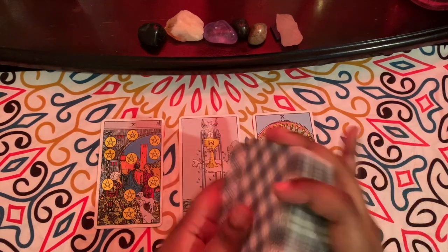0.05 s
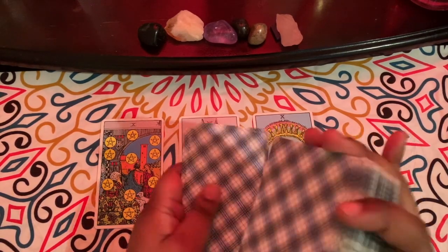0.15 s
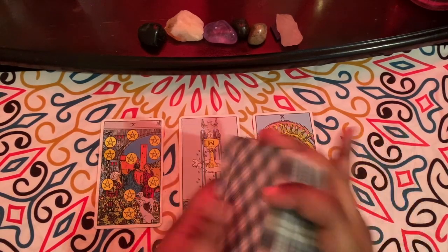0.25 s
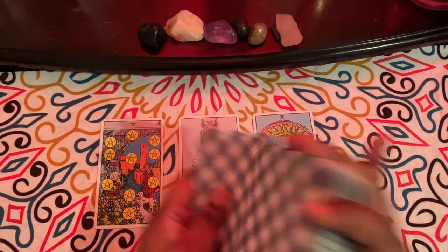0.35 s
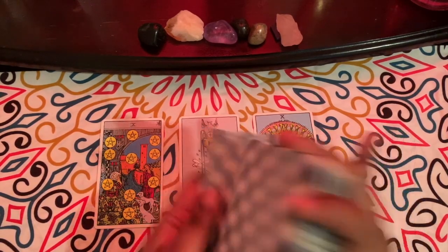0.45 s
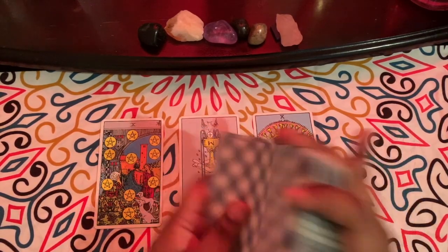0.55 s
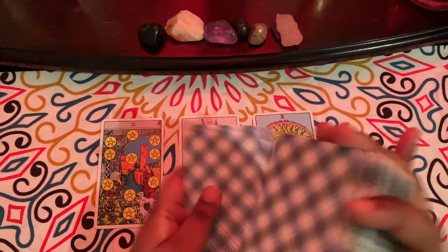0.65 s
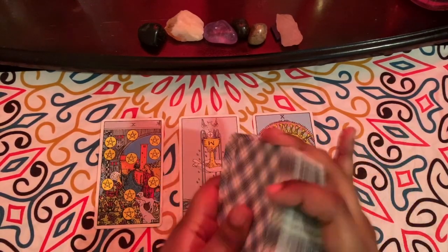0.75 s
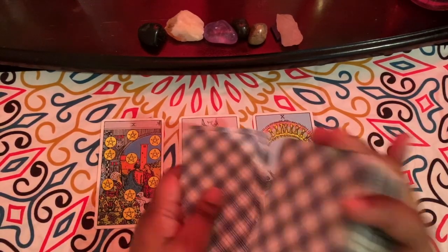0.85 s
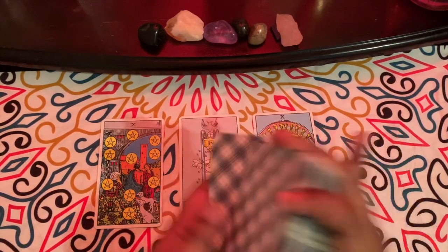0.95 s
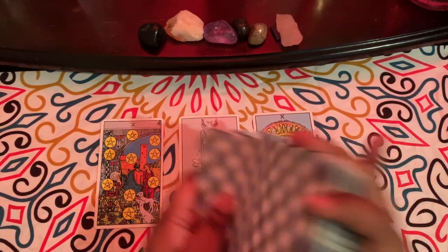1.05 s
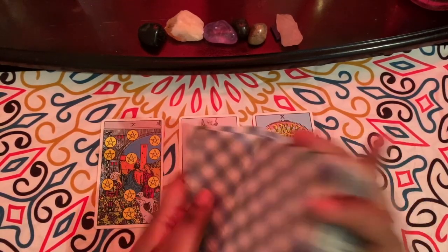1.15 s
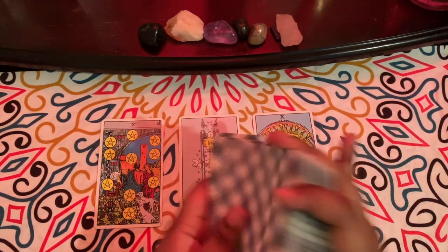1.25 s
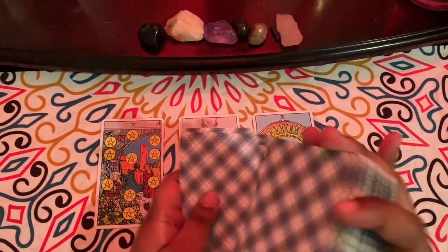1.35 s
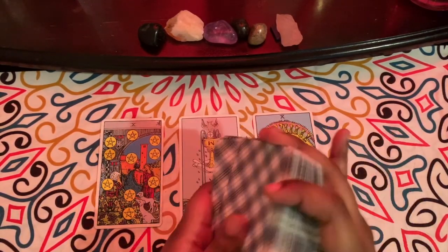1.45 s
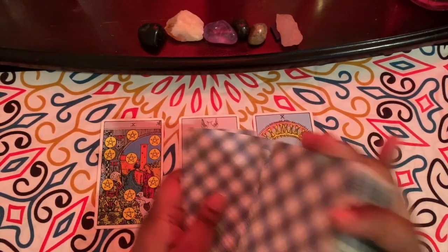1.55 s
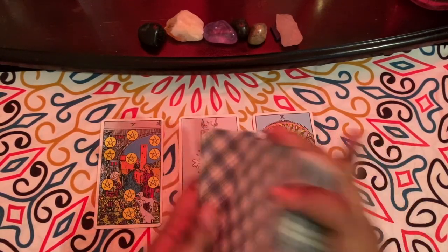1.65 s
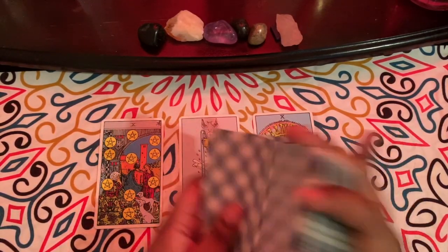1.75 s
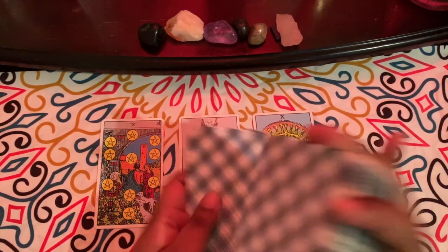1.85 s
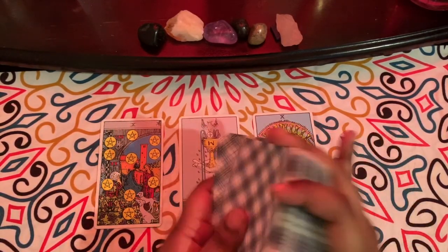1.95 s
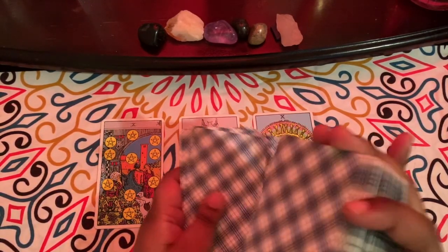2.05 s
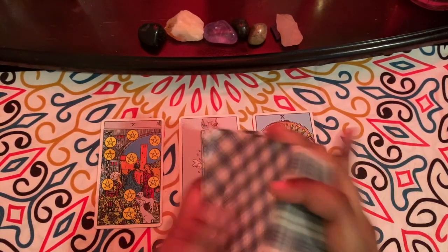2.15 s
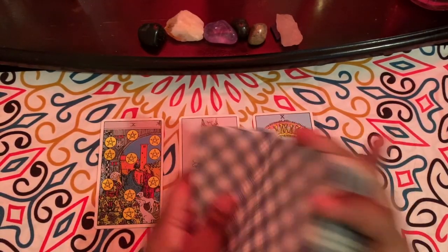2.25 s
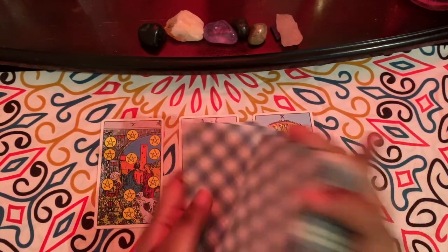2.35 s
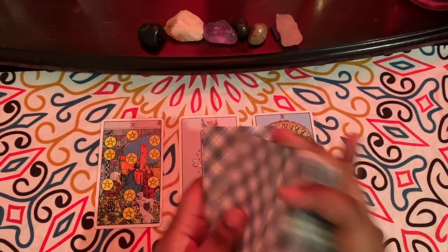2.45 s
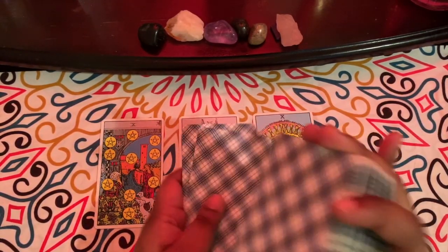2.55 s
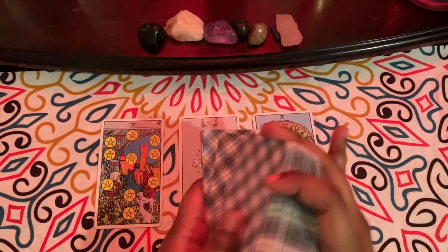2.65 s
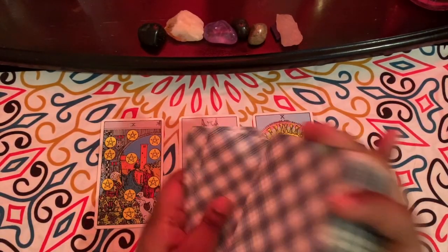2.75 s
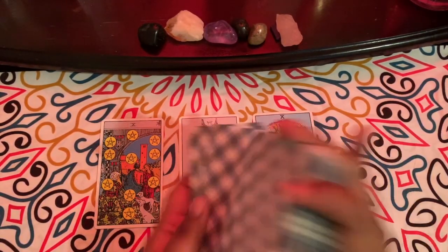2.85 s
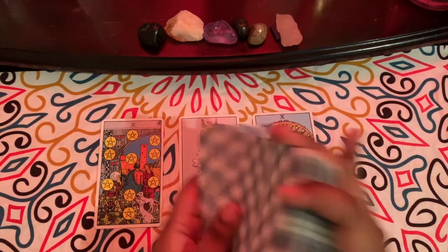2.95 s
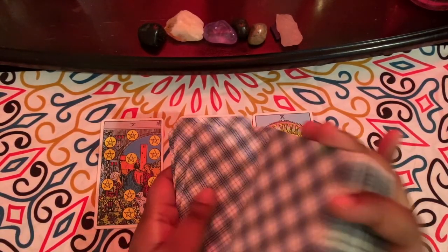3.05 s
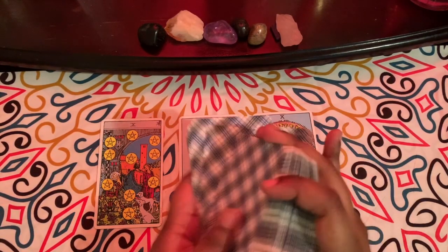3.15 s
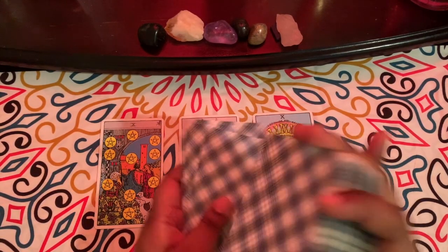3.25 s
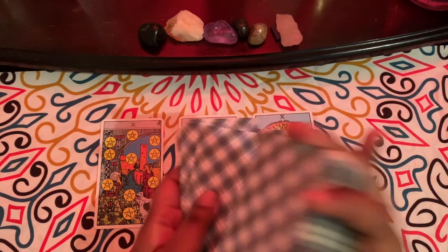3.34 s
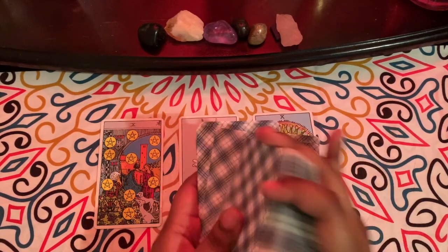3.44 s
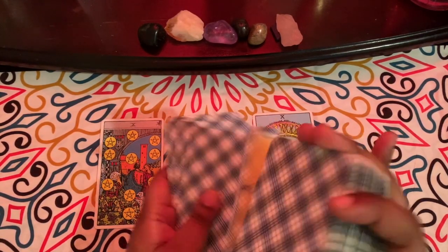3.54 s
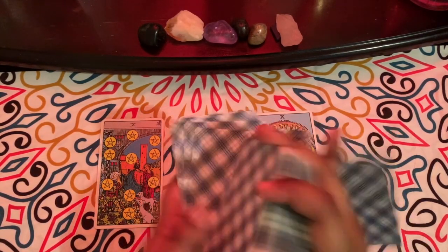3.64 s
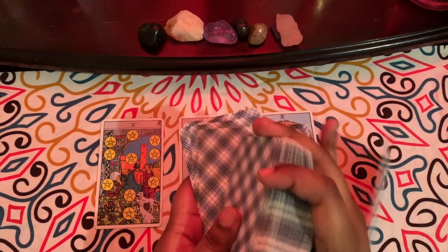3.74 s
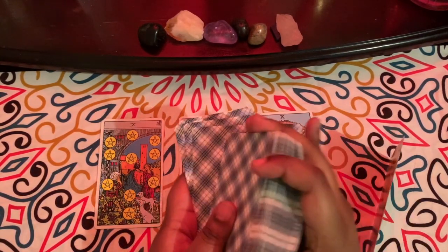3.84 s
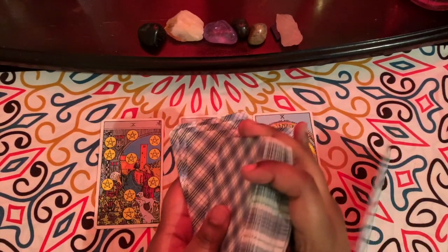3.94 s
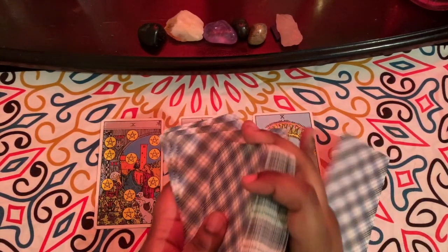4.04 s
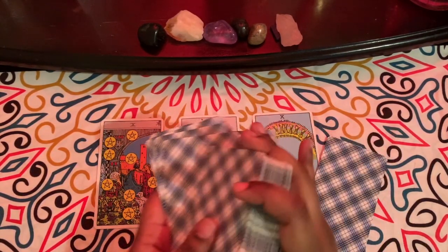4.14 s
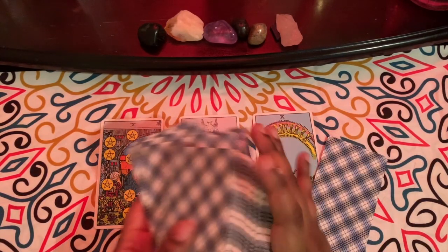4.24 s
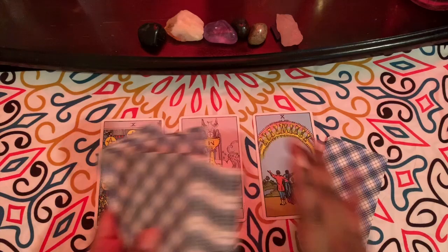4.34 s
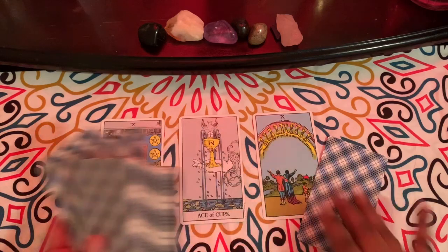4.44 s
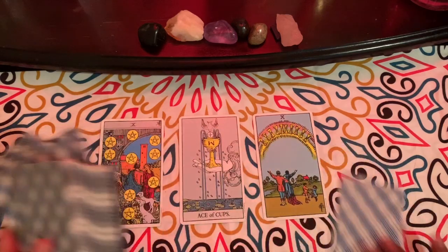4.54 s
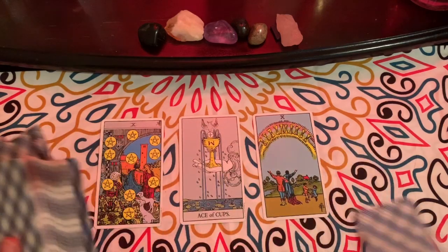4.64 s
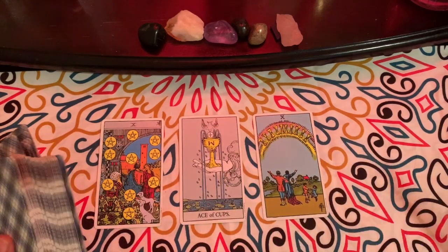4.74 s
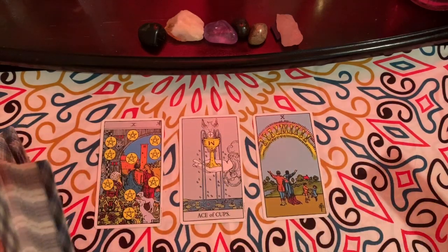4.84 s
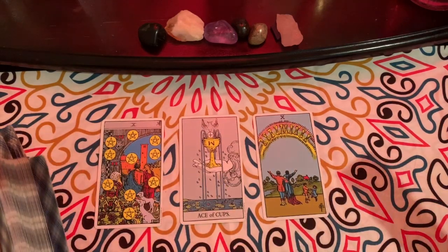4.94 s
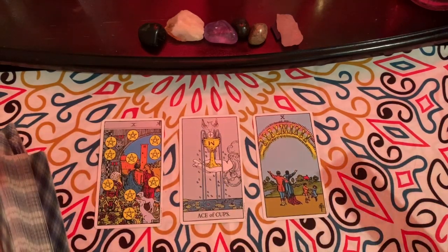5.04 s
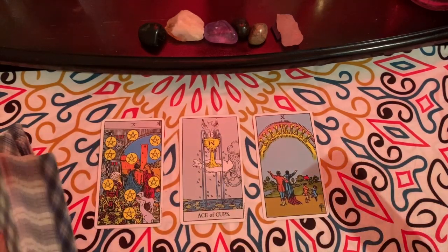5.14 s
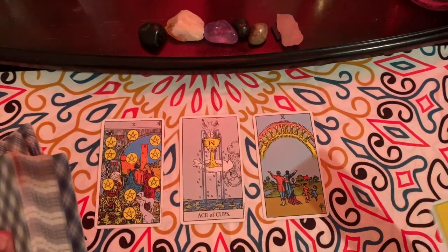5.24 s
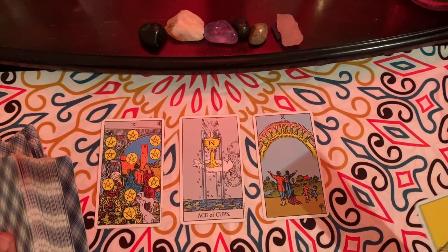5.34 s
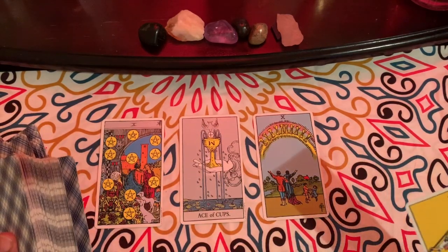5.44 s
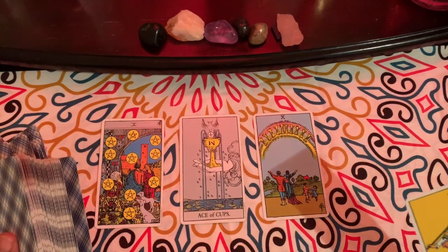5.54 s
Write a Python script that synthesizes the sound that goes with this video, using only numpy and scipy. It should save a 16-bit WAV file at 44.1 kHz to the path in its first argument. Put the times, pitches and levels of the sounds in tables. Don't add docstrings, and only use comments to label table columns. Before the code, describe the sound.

A close, detailed stereo sound of playing cards in a quiet room with slight reverberation. From 0 to about 3.7 s a deck is shuffled overhand in a steady rhythm, roughly four strokes per second. Each stroke has two parts: a packet drops with a small cluster of papery clicks and a rustle, then slides with a grainy swish that swells into a crisp, hollow slap, with bright edge snaps and a slight low push of air. Strokes vary a little in brightness and force. The last slap comes near 3.57 s, a final drop at 3.65 s. At 3.76 s a soft, dull landing on padded cloth; around 4.05 to 4.27 s, faint ticks and short card strokes; near 4.49 s a small snap with a low soft thud. A weak brush and muffled tap follow at 4.7 to 4.8 s. Then only faint air, low rumble and barely audible hum until about 5.6 s.

```python
import sys
import numpy as np
from scipy import signal
from scipy.fft import rfft, irfft, next_fast_len
from scipy.io import wavfile
from scipy.ndimage import uniform_filter1d

SR = 44100
rng = np.random.default_rng(int(sys.argv[2]) if len(sys.argv) > 2 else 0)


def store_wav(level_fs):
    pcm = np.round(np.clip(np.atleast_2d(level_fs), -1, 1) * 32767)
    wavfile.write(sys.argv[1], SR, pcm.T.astype(np.int16))


def voltage_ratio(level):
    return 10 ** (np.asarray(level, float) / 20)


N = 246519

# t/s, ring level/dB, snap level/dB, snap f/Hz, edge tick level/dB
SLAP_CORNERS = [(0.166, -25, -14, 3400, -22), (0.4124, -13, -9.5, 3944, -9),
                (0.6361, -17, -12.5, 3830, -11), (0.8734, -15, -10.5, 3240, -9.5),
                (1.1231, -13.5, -9.5, 3030, -12), (1.35, -12.5, -6.5, 3130, -7),
                (1.573, -17.5, -15, 3404, -19.5), (1.8276, -21, -14.5, 3555, -3.5),
                (2.0637, -10, -6, 3260, -8), (2.3125, -17.5, -5.5, 3700, -7),
                (2.5457, -20.5, -7, 1910, -10.5), (2.7829, -18.5, -13.5, 2290, -10),
                (3.0486, -22.5, -4, 3230, -10.5), (3.284, -28.5, -17.5, 4100, -6.5),
                (3.2894, -17.5, -12.5, 4030, -17.5)]
# t/s, ring level/dB, snap level/dB, snap f/Hz, edge tick level/dB
SLAP_EDGES = [(0.1717, -4, -6.5, 3860, -12.5), (0.4195, -12.5, -7.5, 3850, -7), (0.6418, -8, -8, 3270, -6),
              (0.8785, -7, -47, 1910, -6.5), (1.129, -14, -15, 2850, -1), (1.3555, -8, -7.5, 3100, -7),
              (1.5795, -8.5, -8, 3160, 1.5), (1.8327, -3, -10, 3360, -13), (2.0689, -1.5, -5, 2300, -7),
              (2.318, -22.5, -6.5, 3580, 2), (2.55, -4, -2.5, 1950, -2), (2.7872, -10.5, -2, 2080, 3),
              (3.0537, -15.5, -10, 3530, 1.5), (3.2933, -10.5, -8.5, 2000, -0.5),
              (3.568, -5, -7.5, 3400, -6.5)]
DECK_HZ, CORNER_HZ = 1250, 1400
CRACK_HZ, CRACK_DB = 2000, -6
# t/s, ring level/dB, ring f/Hz, edge tick level/dB
TOUCHES = [(0.0464, -18, 2030, -8.5), (0.2821, -22.5, 1150, -13), (0.5038, -41, 1640, -22),
           (0.756, -37, 1280, -16), (0.9948, -23.5, 915, -23), (1.2275, -17, 892, -13.5),
           (1.4663, -38.5, 920, -14.5), (1.7023, -20, 857, -20), (1.9503, -29.5, 910, -13),
           (2.1859, -18.5, 1030, -22), (2.425, -10, 1178, -17), (2.6684, -28.5, 860, -14),
           (2.9149, -23.5, 700, -33.5), (3.1613, -11.5, 1329, -15), (3.4105, -8.5, 760, -48.5),
           (3.6508, -24.5, 690, -19)]
# t/s, ring level/dB, ring f/Hz, edge tick
# level/dB
LANDINGS = [(0.058, -13, 1024, -12), (0.284, -26, 1100, -33), (0.2901, -13, 990, -35.5),
            (0.514, -30, 1240, -5.5), (0.5186, -12.5, 1220, -14), (0.7659, -16.5, 1000, -10.5),
            (1.002, -35, 1100, -25), (1.235, -18.5, 904, -13.5), (1.2393, -15.5, 895, -31),
            (1.247, -23.5, 1000, -17.5), (1.4732, -9, 1110, -17), (1.485, -25, 1240, -29),
            (1.71, -20.5, 712, -14), (1.9552, -7, 1210, -4.5), (1.96, -14.5, 1294, -15.5),
            (1.9665, -19.5, 1290, -35.5), (2.194, -22, 1020, -13), (2.4318, -15, 1230, -24),
            (2.4413, -14.5, 1230, -28), (2.6734, -16.5, 1183, -13.5), (2.9285, -38, 1197, -24.5),
            (3.1674, -13, 1247, -4.5), (3.172, -12, 700, -13), (3.1789, -14, 1247, -14.5),
            (3.4214, -17.5, 795, -14.5), (3.6559, -20.5, 1250, -4), (3.67, -23.5, 1100, -20)]
# t/s, ring level/dB, ring
# f/Hz, edge tick level/dB
STRAY_EDGES = [(0.074, -18.5, 1250, -45.5), (0.3107, -25.5, 1230, -12), (0.546, -35, 995, -28),
               (0.7814, -18, 1020, -13), (0.7864, -6, 1213, -13), (1.021, -28, 930, -18),
               (1.26, -24, 2200, -18), (1.4914, -21, 760, -23), (1.4963, -13.5, 1220, -20.5),
               (2.218, -36.5, 1079, -16), (2.4608, -28.5, 1270, -18), (2.699, -35, 1410, -23.5),
               (2.936, -24, 1350, -22.5), (2.958, -26.5, 1260, -41.5), (3.257, -25, 1670, -24),
               (3.429, -25, 1109, -13), (3.5906, -29.5, 1200, -19), (3.678, -23.5, 1060, -12),
               (0.0808, -24, 1300, -29), (0.173, -11, 1770, -29.5), (0.316, -19, 1300, -18),
          (0.527, -17, 1100, -27.5), (0.553, -33, 1300, -26), (0.76, -40, 1200, -28),
          (0.953, -55, 1634, -31.5), (1.012, -27.5, 1250, -29.5), (0.75, -22.5, 1300, -33.5),
          (1.2335, -15, 1453, -28.5), (1.508, -27.5, 1250, -42.5), (1.734, -27, 1444, -33.5),
          (1.985, -31, 1300, -31.5), (2.226, -29, 797, -34.5), (2.437, -18, 1227, -30.5),
          (2.453, -28, 1250, -32.5), (2.679, -21.5, 570, -19), (2.703, -35.5, 1300, -25),
          (3.227, -33, 1320, -35), (3.445, -30, 900, -33), (3.569, -8, 850, -34.5),
          (3.598, -24.5, 900, -33), (3.8, -42, 1300, -33)]
FACE_HZ, FACE_SPREAD, FACE_DB = 3200, 0.42, -11.5
# t/s, ring level/dB, ring f/Hz, snap level/dB, snap f/Hz
TAPS = [(3.762, -31, 530, -60, 1510), (3.887, -49, 1250, -49, 2620), (4.0445, -34, 1300, -37, 3400),
        (4.0494, -28.5, 1230, -29.5, 4200), (4.0513, -35, 1700, -42, 4400), (4.118, -49, 900, -40, 3320),
        (4.221, -40, 1600, -61, 3460), (4.245, -44, 1600, -33, 4020), (4.2675, -35.5, 680, -30, 2455),
        (4.482, -40, 1740, -28, 3200), (4.492, -48, 1910, -38.5, 3000), (4.5033, -44, 1520, -31.5, 6200),
        (4.76, -65.5, 890, -68, 1990)]
TAP_EDGE_DB = -4
# t/s, level/dB, f/Hz
FACE_SNAPS = [(0.0464, -19.5, 3300), (0.058, -23, 3250), (0.074, -23, 3300), (0.2895, -21, 3260),
              (0.505, -23, 2420), (0.5187, -9, 3120), (0.7864, -14, 2300), (0.9948, -23, 2590),
              (1.07, -21.5, 3490), (1.2275, -17, 2200), (1.24, -22, 2290), (1.26, -24, 2200),
              (1.4663, -18, 2996), (1.4959, -13.5, 3880), (1.7023, -25.5, 2000), (1.9503, -20, 2500),
              (1.9556, -12, 2200), (2.1859, -19.5, 3800), (2.22, -25.5, 3000), (2.425, -18.5, 3000),
              (2.6684, -26, 2800), (2.9149, -29, 2202), (2.958, -28.5, 3500), (3.1672, -9.5, 4030),
              (3.4095, -30, 1780), (3.6563, -7, 2920), (3.659, -24, 4250), (4.016, -46, 1140),
              (4.4815, -30, 2880), (4.488, -40, 2980)]
# f/Hz, level/dB
TICK_SPECTRUM = [(1500, -67.5), (3500, -29.5), (5000, 1), (7500, 2.5), (12000, -4.5), (14000, -4.5),
                 (16500, -28.5)]

# t/s, rustle level/dB, air thump level/dB, knock level/dB
DROPS = [(0.042, -14, -50, -36.5), (0.281, -11.5, -55, -34), (0.512, -12, -42, -35.5),
         (0.756, -10.5, -37, -36.5), (0.992, -12.5, -40.5, -37), (1.227, -9.5, -43.5, -35.5),
         (1.465, -12, -41, -63), (1.701, -13.5, -39, -32.5), (1.946, -11.5, -44.5, -42),
         (2.183, -12.5, -48.5, -34), (2.421, -10, -46.5, -32), (2.667, -15, -47, -32.5),
         (2.91, -14.5, -68.5, -36.5), (3.156, -10, -45, -36), (3.405, -13.5, -46, -36),
         (3.65, -7.5, -50.5, -30.5)]
# t/s, slide level/dB, slide length/s, thump level/dB, knock level/dB
SLAPS = [(0.163, -3, 0.092, -36, -29.5), (0.41, -3, 0.079, -39.5, -35), (0.635, -3, 0.07, -35, -28.5),
         (0.872, -4, 0.072, -36, -27.5), (1.123, -1.5, 0.067, -36.5, -30.5), (1.351, -2, 0.072, -37, -24.5),
         (1.577, 1, 0.059, -34, -29.5), (1.829, -1.5, 0.076, -35, -27.5), (2.066, -1.5, 0.067, -35, -24.5),
         (2.314, -1.5, 0.075, -35.5, -31.5), (2.548, -3, 0.07, -34, -33.5), (2.786, 0.5, 0.054, -35.5, -36),
         (3.051, -3, 0.079, -36, -32), (3.29, -1.5, 0.079, -36.5, -35.5), (3.573, -4.5, 0.12, -36.5, -35.5)]
RUSTLE_S, SWELL_DB = 0.039, 2
SETTLE_DB, SETTLE_T60 = -41.5, 0.31
# f/Hz, level/dB
SCRAPE_SPECTRUM = [(200, -19.5), (500, -4.5), (950, -2.5), (1280, -7.5), (1700, -2), (3300, -6.5),
                   (5500, -7.5), (8000, -12.5), (12500, -18), (14000, -30), (16000, -27.5)]
# f/Hz, level/dB
SWISH_SPECTRUM = [(200, -6), (700, -6.5), (1500, -2.5), (3000, 2.5), (5000, -5), (7500, -4.5),
                  (12500, -13.5), (14000, -17.5), (16000, -22)]
SLIPS_PER_S, SLIP_SPREAD_DB, SLIP_DB, SLIP_S = 900, 4, -7, 0.0003
HOLLOW_HZ, HOLLOW_WIDTH_HZ, HOLLOW_DB = 1250, 60, -16.5

# t/s of peak, level/dB, rise/s, fall/s (each over 20 dB), brightness/dB
ZIPS = [(0.158, -42.5, 0.044, .015, 4.5), (0.398, -39, .03, 0.016, 5), (0.508, -35.5, 0.0044, 0.013, -7),
        (0.628, -30.5, .03, 0.014, -7), (0.858, -37.5, .04, 0.02, -4), (1.07, -38, 0.01, .04, -10),
        (1.115, -41, .04, .015, 0.5), (1.34, -34.5, .04, 0.017, -1.5), (1.566, -38, 0.023, .02, 7),
        (1.816, -33, 0.046, 0.033, -4), (2.052, -35.5, 0.033, .02, 1), (2.303, -33.5, .04, .02, 3),
        (2.536, -31, 0.028, .015, 1), (2.776, -33, 0.05, 0.031, -1), (3.035, -34.5, 0.043, 0.028, 1),
        (3.277, -36, 0.046, 0.022, 0.5), (3.55, -40, 0.023, 0.01282, 13.5), (3.665, -36, .02, 0.061, -5)]
# f/Hz, level/dB
ZIP_LOW = [(800, -23.5), (2500, -10), (4000, -3), (7000, 3), (10000, -17)]
# f/Hz, level/dB
ZIP_HIGH = [(4000, -25), (7500, 0), (12000, -1), (15000, -7), (16500, -18.5)]
# t/s of peak, level/dB, f/Hz, rise/s, fall/s
SINGS = [(0.385, -47, 1600, 0.033, 0.024), (0.525, -39.5, 1150, 0.013, 0.035),
         (1.242, -34, 1400, 0.024, 0.044), (2.433, -30.5, 1240, 0.012, 0.034),
         (2.674, -34.5, 1150, 0.0079, .04), (2.93, -37, 1250, 0.023, 0.044),
         (3.17, -32.5, 1250, 0.015, 0.053), (3.596, -35, 943, .03, 0.037), (3.672, -34, 1170, .02, 0.06),
         (4.041, -56.5, 3440, 0.076, 0.13), (4.046, -46, 1111, 0.069, 0.044),
         (4.051, -46, 1580, 0.025, 0.024), (3.7, -65, 1644, 0.042, .1), (4.234, -59, 1728, 0.094, 0.04),
         (4.299, -63.5, 1540, 0.037, 0.038), (4.49, -53, 3100, .01, 0.046), (4.7, -69, 1792, 0.065, .06)]
SING_WIDTH_HZ = 310
# t/s of peak, level/dB, rise/s, fall/s (each over 20 dB), brightness/dB
STROKES = [
    (3.779, -45, 0.069, 0.078, -10),
    (4.048, -49, 0.043, 0.037, 1),
    (4.12, -56.5, 0.17, 0.14, -9),
    (4.245, -50, 0.046, 0.076, -3.5),
    (4.488, -56.5, 0.01, 0.051, 8.5),
    (4.4, -76.5, 0.16, 0.18, 3),
    (4.571, -69.5, 0.093, 0.1, 18.5),
    (4.699, -64.5, 0.063, 0.06, 2.5),
]
# f/Hz, level/dB
CLOTH_DULL = [(250, 5.0), (1300, 6.0), (3000, -2.5), (5000, -2.0), (8000, -23)]
# f/Hz, level/dB
CLOTH_HISS = [(1200, -43), (2500, -17), (4000, -5), (6500, -1.5), (12000, -10.5), (15500, -17.5), (16500, -39)]
# t/s, level/dB, body f/Hz, T60/s
THUDS = [
    (3.763, -29.5, 340, 0.068),
    (4.49, -39, 111, 0.097),
    (4.491, -48.5, 324, 0.096),
    (4.589, -56, 385, 0.069),
    (4.76, -50, 330, 0.1),
    (4.762, -63, 890, 0.14),
    (4.762, -59, 598, 0.21),
    (4.775, -46, 94.7, 0.15),
]

ECHO_S, ECHO_HZ, ECHO_WIDTH_HZ, ECHO_DB = 0.0118, 1310, 380, -11
# f/Hz, T60/s
ROOM_T60 = [(100, 1), (400, 0.54), (1300, 0.33), (4000, 0.4), (12000, 0.29)]
# f/Hz, level/dB
PORT_TILT = [(60, 1.2), (250, .7), (600, 4), (1250, 1), (2300, 3), (3600, 0), (4500, 3), (5100, 1.8),
             (15000, .3)]
# f/Hz, phase/rad
CARD_LEAD = [(0, 0), (500, .4), (800, -.5), (2400, -1.3), (4200, -1.1), (5050, -3.14), (9000, -9),
             (10000, -9.9), (13300, -15.3), (14500, -16.3), (17000, -20.5)]
# f/Hz, phase/rad
AIR_LEAD = [(0, 0), (250, -.6), (600, -2.2), (2000, -2), (4300, -1.9), (5300, -3.6), (7200, -6.3),
            (9450, -9.42), (13600, -15.7), (17000, -20.5)]
# t/s, level/dB
RUMBLE = [(0.0, -50), (0.67, -57), (0.86, -55), (3.05, -55), (3.19, -48), (4.17, -58), (4.45, -57.5),
          (4.67, -48), (4.76, -59.5), (5.06, -63.5), (5.59, -57.5)]
# f/Hz, level/dB
AIR_SPECTRUM = [(25, -16.5), (55, -5), (110, -6.5), (230, -16), (500, -26.5), (1000, -29), (2200, -40.5),
                (4000, -42), (13000, -41.5), (16000, -53.5)]
AIR_DB = -66.5
# f/Hz, width/Hz, level/dB, start t/s, end t/s
HUMS = [
    (286.3, 13, -72, 4.75, 5.8),
    (623, 14, -72, 4.4, 5.0),
    (700, 11, -77, 4.86, 5.35),
    (209, 14, -68, 3.9, 4.25),
    (422, 17, -71.5, 3.76, 4.3),
    (625, 16, -71, 3.8, 5.1),
]


def evened(x):
    return x / np.sqrt(np.mean(x ** 2) + 1e-20)


def read(points, hz):
    f, value = np.transpose(points)
    return np.interp(np.log(hz + 1), np.log(f + 1), value)


def add(mix, s, sound):
    part = mix[round(s * SR):][:len(sound)]
    part += sound[:len(part)]


def coloured(points, patchy_db):
    frames, hz = N // 128 + 5, np.fft.rfftfreq(512, 1 / SR)
    real, imag, patches = rng.standard_normal((frames, 257, 3)).T
    patches = uniform_filter1d(patches, size=8, axis=0, mode="wrap")
    patches = evened(uniform_filter1d(patches, size=5, axis=1, mode="wrap"))
    level_db = read(points, hz)[:, None] + patchy_db * patches
    z = (real + 1j * imag) * voltage_ratio(level_db)
    return evened(signal.istft(z, nperseg=512, noverlap=384)[1][:N])


def band(x, hz, width):
    r = np.exp(-np.pi * width / SR)
    return evened(signal.lfilter([1, 0, -1], [1, -2 * r * np.cos(2 * np.pi * hz / SR), r * r], x))


def swell(t, s, db, rise, fall):
    span = np.maximum(np.where(t < s, rise, fall), .004)
    return voltage_ratio(db - 20 * abs(t - s) / span)


def click(ring_db, ring_hz, snap_db, snap_hz, tick_db, chance, tick_noise):
    t = np.arange(len(chance)) / SR
    blow = (chance + 4.0 * (t == 0)) * np.exp(-t / 0.0006)
    ring = band(band(blow, ring_hz, 360), ring_hz, 1800)
    crack = band(band(blow, CRACK_HZ, 1500), CRACK_HZ, 2500)
    snap = band(band(blow, snap_hz, 950), snap_hz, 4600)
    tick = tick_noise * np.exp(-t / .0014) * np.clip(t / .0003, 0, 1)
    parts = (ring_db - 2.0, ring), (ring_db + CRACK_DB, crack), (snap_db, snap), (tick_db - 4.5, tick)
    return sum(voltage_ratio(db) * part / abs(part).max() for db, part in parts)


def clicks():
    rows = [(s, ring_db, CORNER_HZ, *edge) for s, ring_db, *edge in SLAP_CORNERS]
    rows += [(s, ring_db, DECK_HZ, *edge) for s, ring_db, *edge in SLAP_EDGES]
    loose = TOUCHES + LANDINGS + STRAY_EDGES
    for (*ring, edge_db), size in zip(loose, rng.standard_normal(len(loose))):
        face_hz = FACE_HZ * np.exp(FACE_SPREAD * size)
        rows.append((*ring, edge_db + FACE_DB, face_hz, edge_db))
    rows += [(*tap, tap[3] + TAP_EDGE_DB) for tap in TAPS]
    rows += [(s, db - 31, DECK_HZ, db, hz, db - 19.5) for s, db, hz in FACE_SNAPS]
    out, tick_noise = np.zeros(N), coloured(TICK_SPECTRUM, 2.6)
    for (s, *row), chance in zip(rows, rng.standard_normal((len(rows), 600))):
        add(out, s, click(*row, chance, tick_noise[round(s * SR):][:600]))
    return out


def slips():
    size = voltage_ratio(SLIP_SPREAD_DB * np.minimum(rng.exponential(1, N), 2.5))
    size *= rng.random(N) < SLIPS_PER_S / SR
    puffs = signal.oaconvolve(size, np.exp(-np.arange(300) / SR / SLIP_S))[:N]
    return evened(puffs * coloured(SCRAPE_SPECTRUM, 1.0))


def shuffle():
    t = np.arange(0, N + 16, 16) / SR
    rustle, slide = np.zeros((2, len(t)))
    slide += voltage_ratio(-55.0 - 90 * t)
    for s, db, *_ in DROPS:
        u = (t - s - .002) / RUSTLE_S
        rustle += voltage_ratio(db - 16.5 - 9.6 * np.clip(u, 0, 9) ** 2.0) * np.clip(u * 30, 0, 1)
    for s, db, length, *_ in SLAPS:
        u = (s - t) / max(length, .01)
        gate = np.clip((1 - u) * 5, 0, 1) * np.clip(1 + u * 12, 0, 1)
        slide += voltage_ratio(db - 35.0 - SWELL_DB * np.clip(u, 0, 1)) * gate
        slide += voltage_ratio(db + SETTLE_DB - 60 * abs(t - s) / SETTLE_T60) * (t > s)
        rustle += voltage_ratio(db - 21.5 - 60 * abs(s - t) / np.where(u > 0, .035, .11))
    rustle, slide = (np.interp(np.arange(N) / SR, t, level) for level in (rustle, slide))
    grain = voltage_ratio(0.94 * evened(uniform_filter1d(rng.standard_normal((2, N)), size=70)))
    scrape = evened(grain[0] * coloured(SCRAPE_SPECTRUM, 4.0))
    scrape = evened(scrape + voltage_ratio(SLIP_DB) * slips())
    scrape += voltage_ratio(HOLLOW_DB) * band(scrape, HOLLOW_HZ, HOLLOW_WIDTH_HZ)
    swish = evened(grain[1] ** 0.55 * coloured(SWISH_SPECTRUM, 2.7))
    return rustle * scrape + slide * swish


def zips():
    t = np.arange(0, N + 16, 16) / SR
    low = sum(swell(t, s, db, rise, fall) for s, db, rise, fall, _ in ZIPS)
    high = sum(swell(t, s, db + bright_db, rise, fall) for s, db, rise, fall, bright_db in ZIPS)
    low, high = (np.interp(np.arange(N) / SR, t, level) for level in (low, high))
    return low * coloured(ZIP_LOW, 2.1) + high * coloured(ZIP_HIGH, 2.5)


def thump(db):
    t = np.arange(3000) / SR
    hz = 56 + 150 * np.exp(-t / 0.0069)
    pulse = (t / 0.0097) ** 2 * np.exp(2 - 2 * t / 0.0077)
    return voltage_ratio(db + 12.5) * np.sin(2 * np.pi * np.cumsum(hz) / SR) * pulse


def knock(db, chance):
    t = np.arange(len(chance)) / SR
    body = band(band(chance * np.exp(-t / 0.0086), 230, 160), 200, 750) / 3.0
    return voltage_ratio(db + 8.5 - 60 * t / 0.04) * np.clip(t / 0.0022, 0, 1) * body


def thumps():
    out, rows = np.zeros(N), DROPS + SLAPS
    for (s, *_, thump_db, knock_db), chance in zip(rows, rng.standard_normal((len(rows), 3000))):
        add(out, s + 0.0045, thump(thump_db))
        add(out, s + 0.00039, knock(knock_db, chance))
    return out


def drag():
    t, level, bright = np.arange(N) / SR, 0, 0
    for s, db, rise, fall, bright_db in STROKES:
        stroke = voltage_ratio(db - 20 * abs(t - s) / np.maximum(np.where(t < s, rise, fall), .005))
        level = level + stroke
        bright = bright + voltage_ratio(bright_db) * stroke
    dull = coloured(CLOTH_DULL, 2.5)
    dull += voltage_ratio(-23.5) * band(dull, 1360, 250)
    hiss = coloured(CLOTH_HISS, 2.5)
    grain = evened(voltage_ratio(1.1 * evened(uniform_filter1d(rng.standard_normal(N), size=90))))
    return grain * (level * dull + bright * hiss)


def sings():
    out, t = np.zeros(N), np.arange(-9000, 9000) / SR
    for (s, db, hz, rise, fall), chance in zip(SINGS, rng.standard_normal((len(SINGS), len(t)))):
        tone = band(band(chance, hz, SING_WIDTH_HZ), hz, 3 * SING_WIDTH_HZ)
        add(out, s + t[0], swell(t, 0, db, rise, fall) * tone)
    return out


def thuds():
    out, t = np.zeros(N), np.arange(9000) / SR
    for (s, db, body_hz, t60), chance in zip(THUDS, rng.standard_normal((len(THUDS), 9000))):
        body = band(band(chance, body_hz, 0.29 * body_hz), body_hz, 0.86 * body_hz)
        add(out, s, voltage_ratio(db - 60 * t / t60) * np.clip(t / 0.0015, 0, 1) * body)
    return out


def echo(x):
    out = x.copy()
    peak = signal.iirpeak(ECHO_HZ, ECHO_HZ / ECHO_WIDTH_HZ, fs=SR)
    add(out, ECHO_S, voltage_ratio(ECHO_DB) * signal.lfilter(*peak, x))
    return out


def ports(x, lead):
    size = next_fast_len(N + 8192, real=True)
    hz = np.fft.rfftfreq(size, 1 / SR)
    path = np.exp(-1j * np.interp(hz, *np.transpose(lead))) / voltage_ratio(read(PORT_TILT, hz))
    return np.array([x, irfft(rfft(x, size) * path, size)[:N]])


def room(x):
    taps = np.zeros((2, SR // 2))
    slots = np.arange(200, SR // 2 - 20, 20)
    at = slots + rng.integers(0, 20, (2, len(slots)))
    np.put_along_axis(taps, at, rng.choice([-1., 1.], at.shape), 1)
    hz, t, z = signal.stft(taps, SR, nperseg=256)
    tail = signal.istft(z * voltage_ratio(-60 * t / read(ROOM_T60, hz)[:, None]), SR, nperseg=256)[1]
    tail /= np.linalg.norm(tail, axis=1, keepdims=True)
    return signal.fftconvolve(x[None], tail, axes=1)[:, :N]


def room_tone():
    t, hz = np.arange(N) / SR, np.fft.rfftfreq(N, 1 / SR)
    air = irfft(rfft(rng.standard_normal((2, N))) * voltage_ratio(read(AIR_SPECTRUM, hz)), N)
    air = voltage_ratio(AIR_DB) * evened(air)
    low = voltage_ratio(np.interp(t, *np.transpose(RUMBLE))) * band(band(rng.standard_normal(N), 45, 33), 40, 50)
    for f_hz, width, db, start, end in HUMS:
        fade = np.clip(np.minimum(t - start, end - t) / 0.12, 0, 1)
        low += voltage_ratio(db) * band(rng.standard_normal(N), f_hz, width) * fade
    return ports(air[0] + low, AIR_LEAD) + voltage_ratio(-1.5) * air[1] * [[0], [1]]


def scene():
    strokes, pushes = drag() + sings(), thumps()
    edges, friction = clicks(), shuffle()
    cards = echo(edges + friction) + zips() + pushes + strokes + thuds()
    tail = room(cards)
    dull = signal.sosfilt(signal.butter(2, [70, 5600], "band", fs=SR, output="sos"), tail[1])
    apart = voltage_ratio(-7.5) * clicks() + voltage_ratio(-19.5) * dull
    apart += voltage_ratio(-8) * np.roll(strokes + .7 * friction, shift=300)
    apart += voltage_ratio(-12) * np.roll(pushes, shift=120)
    near = ports(cards + voltage_ratio(-22.0) * tail[0], CARD_LEAD) + apart * [[0], [1]]
    return near * voltage_ratio([[.4], [-.4]]) + room_tone()


def top_cut(x):
    return signal.sosfilt(signal.butter(12, 17140, fs=SR, output="sos"), x)


def record(dry):
    cut = signal.sosfilt(signal.butter(4, 42, "high", fs=SR, output="sos"), dry)
    cut = .9 * np.tanh(cut / .9)
    low_pass = signal.firwin(255, 16050, window=("kaiser", 8), fs=SR)
    cut = signal.oaconvolve(cut, low_pass[None], "same")
    return top_cut(cut)


dry = scene()
out = record(dry)
store_wav(out)
```